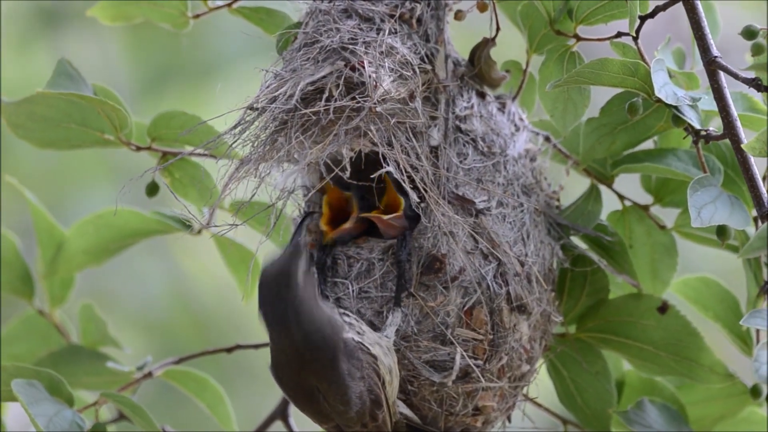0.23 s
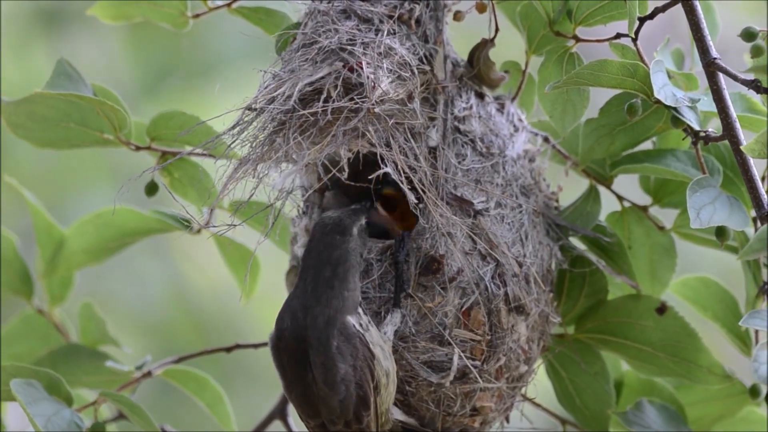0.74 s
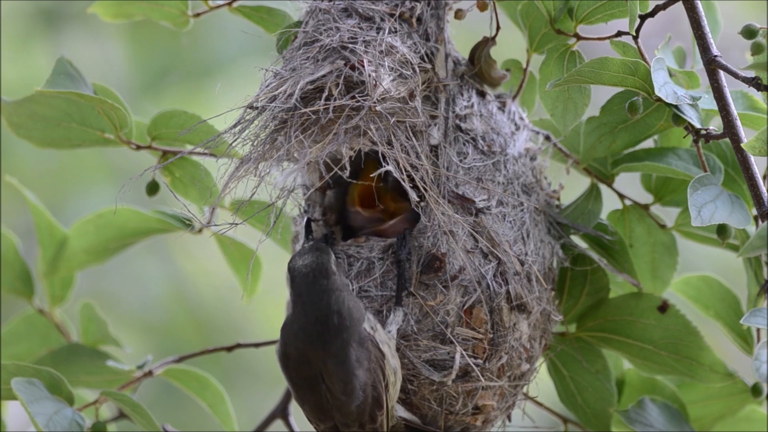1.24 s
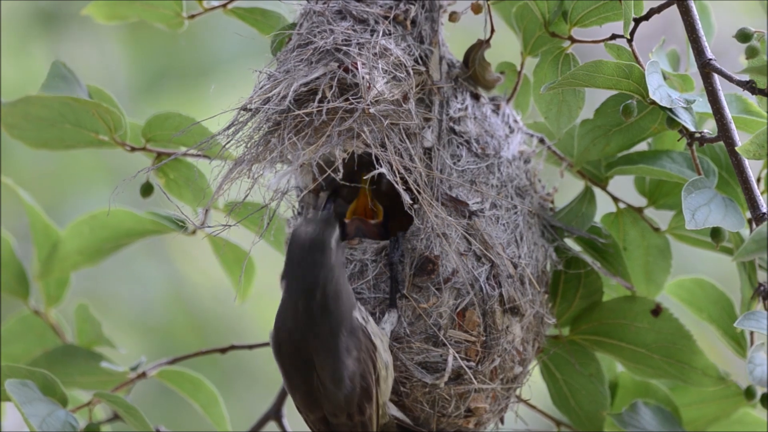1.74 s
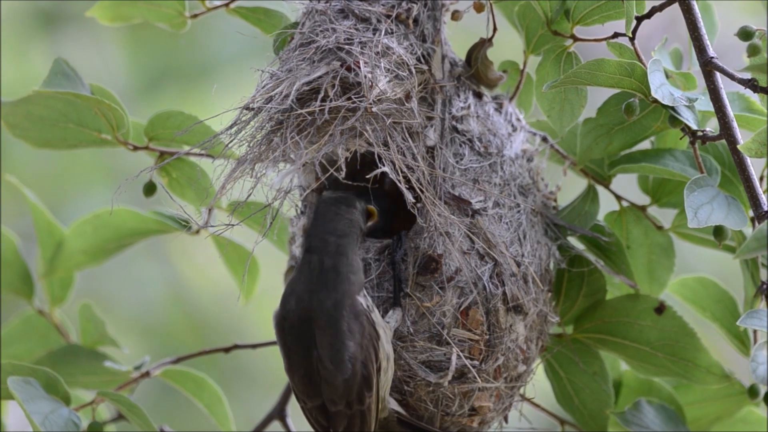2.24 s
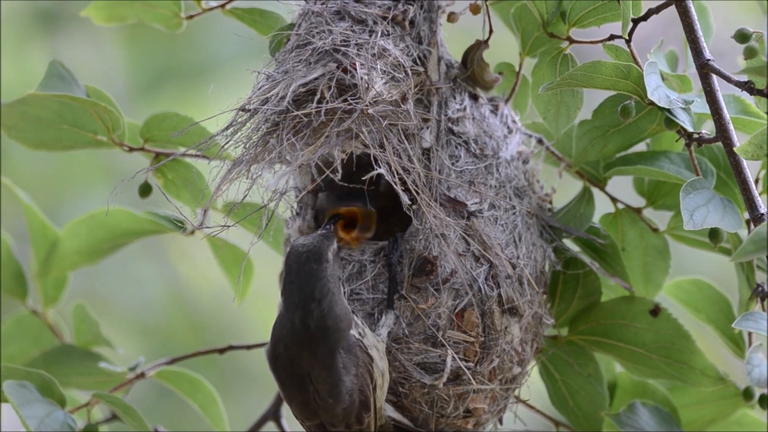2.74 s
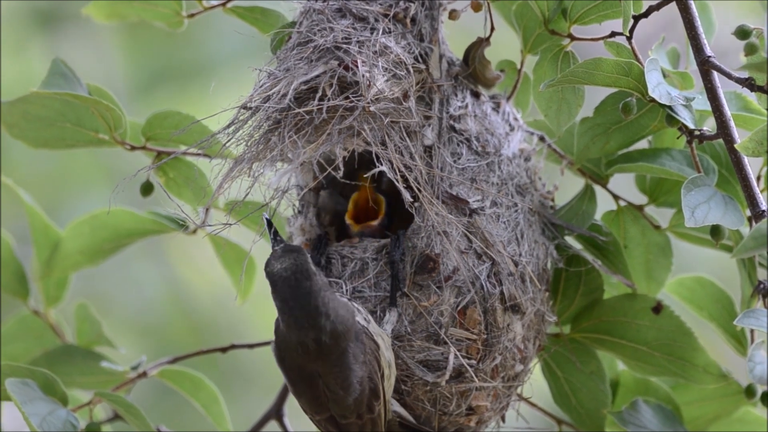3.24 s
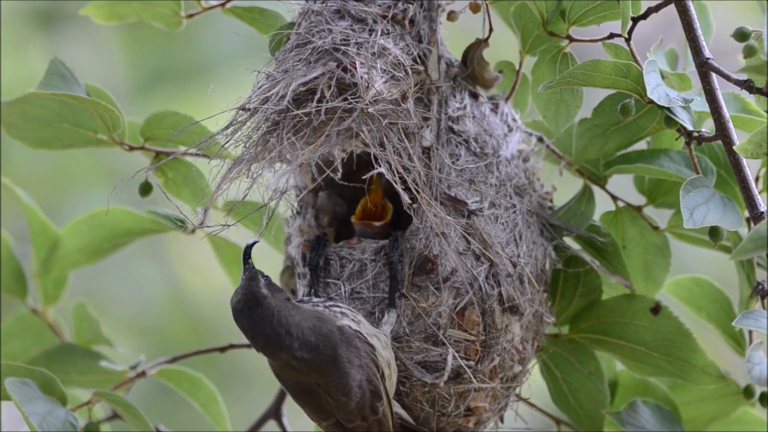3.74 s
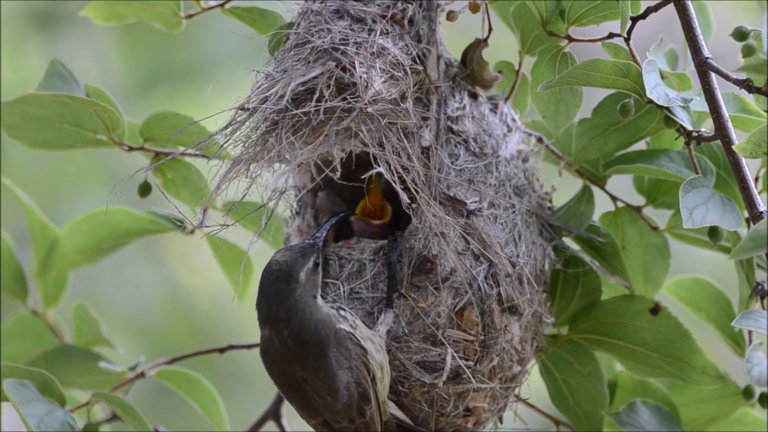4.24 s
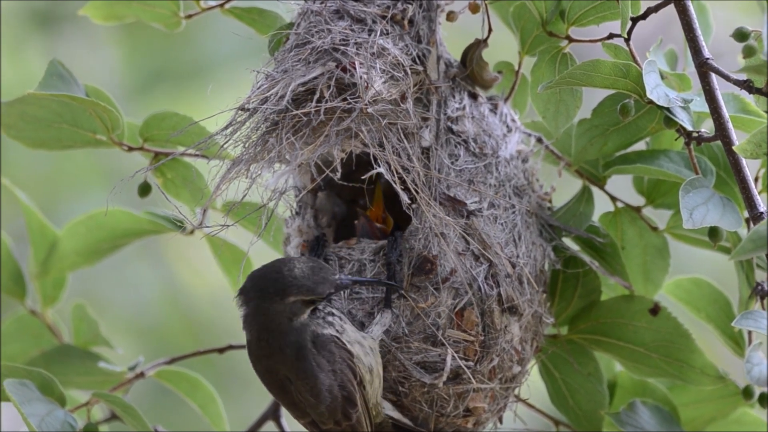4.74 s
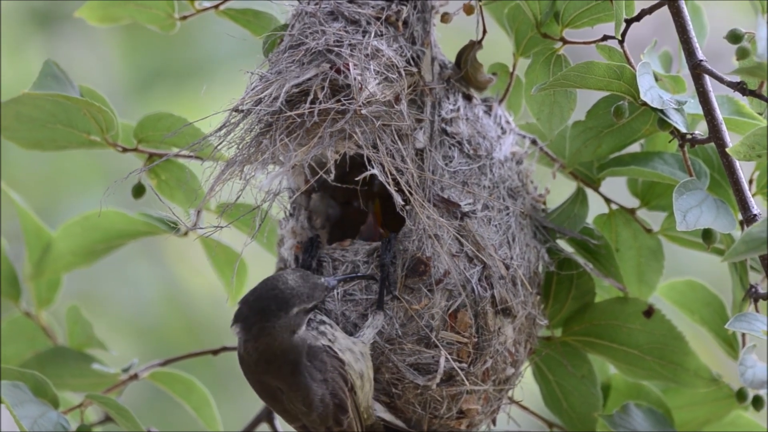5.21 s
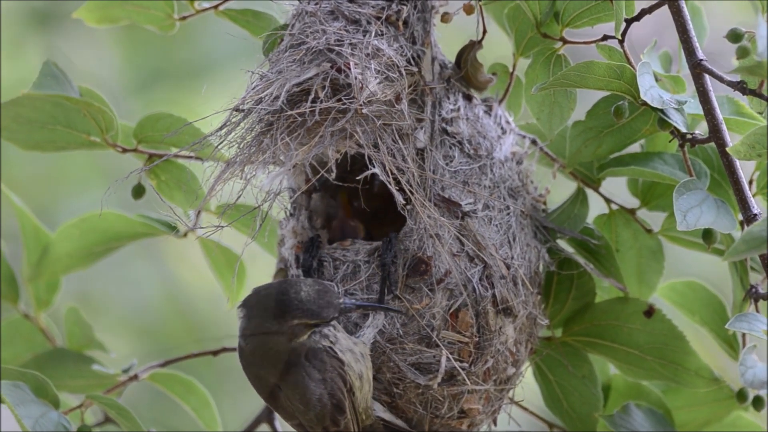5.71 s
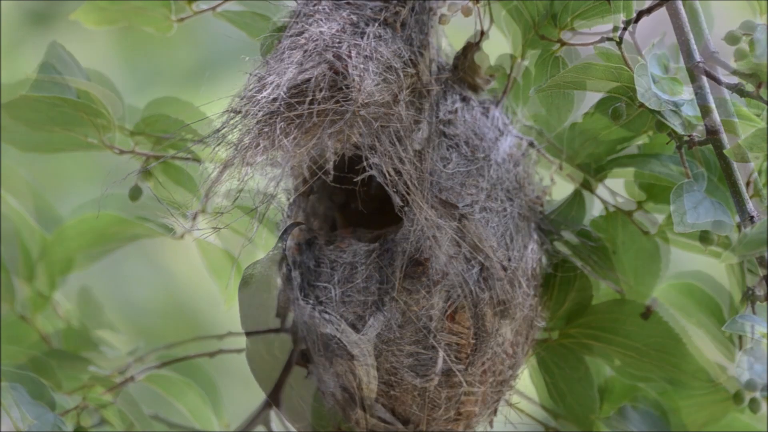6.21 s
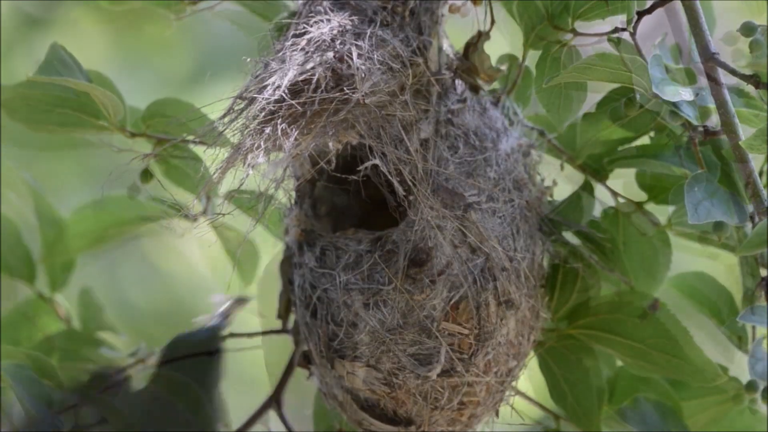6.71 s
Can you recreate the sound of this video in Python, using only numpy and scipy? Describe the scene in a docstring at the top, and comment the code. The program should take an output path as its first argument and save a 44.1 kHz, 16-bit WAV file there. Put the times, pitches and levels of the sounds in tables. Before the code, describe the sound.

Outdoors among leaves, close to a nest, over a faint town murmur, slight hum and soft low rumble. From 0 to 0.3 s a near small bird gives rapid high notes that drop and rebound, and a nestling buzz begins; another two-voiced flourish comes around 0.75 s. Grass scratches and twigs tick near 1 s. A falling chirp at 1.4 s is followed by thin begging, ticks and rustles to 1.9 s. Begging returns at 2.3 s, with faint distant caws from 2.5 to 3.4 s. A chirp falls at 3.1 s amid swelling twitter; varied jumping whistles run from 3.55 to 4.3 s, with rustles and clicks. A faint short trill at 4.7 s leads to a stronger chirp at 4.9 s. The loudest, densest whistles burst from 5.2 to 5.65 s with a sharp tick and soft bump. Begging buzzes at 6.1 s, one chirp falls at 6.5 s, and quick rising notes close at 6.9 s.

```python
"""A small songbird calls near the microphone in a garden: two-voiced whistles glide and jump, with leafy echoes.
Fainter whistles answer softly, nestlings beg in a high buzz and a flickering twitter swells; twigs tick,
dry grass rustles and a town murmurs with a faint hum and a low rumble. The whistles are gliding sines,
the near ones with overtones and breath; twitter, buzz and town are coloured noise; ticks, crackles and
grass are short bursts and clicks."""
import sys
import numpy as np
from scipy import signal
from scipy.fft import rfft, irfft, next_fast_len
from scipy.io import wavfile
from scipy.ndimage import uniform_filter1d, map_coordinates

SR = 44100
rng = np.random.default_rng(int(sys.argv[2]) if len(sys.argv) > 2 else 0)


def to_wav(s):
    """Save 16-bit WAV."""
    ch = np.atleast_2d(s).T  # columns
    pcm = np.round(np.clip(ch, -1, 1) * 32767)  # PCM
    wavfile.write(sys.argv[1], SR, pcm.astype(np.int16))


N = 306936  # length in samples

# How the echo of the foliage dies away. Each row: frequency in Hz, time to fall by 60 dB in seconds.
LEAVES = [(1200, 0.18), (3000, 0.18), (6000, 0.23), (12000, 0.15)]


def amp(db):
    """Turns decibels into a linear gain."""
    return 10 ** (np.asarray(db) / 20)


def unit(x):
    """Scales a signal to an rms of 1."""
    return x / np.sqrt(np.mean(x ** 2) + 1e-20)


def along(points, hz):
    """Reads a curve of (Hz, value) points on a logarithmic frequency axis."""
    f, v = np.transpose(points)
    return np.interp(np.log(hz + 1), np.log(f + 1), v)


def wobble(rate):
    """A smooth random curve through `rate` random knots a second."""
    knots = rng.standard_normal(int(N * rate / SR) + 4)
    return map_coordinates(knots, [np.arange(N) * rate / SR])


def filtered(x, response):
    """Shapes the spectrum of x with a gain that depends on frequency."""
    m = next_fast_len(N + SR // 2)
    return irfft(rfft(x, m) * response(np.fft.rfftfreq(m, 1 / SR)), m)[:N]


def rush(spectrum, patchy_db):
    """Coloured noise of rms 1, uneven in time and frequency through patches of random gain."""
    z = signal.stft(rng.standard_normal(N), nperseg=256)[2]
    patches = uniform_filter1d(rng.standard_normal(z.shape), size=3, axis=0)
    patches = uniform_filter1d(patches, size=6, axis=1)
    x = signal.istft(z * amp(patchy_db * unit(patches)), nperseg=256)[1][:N]
    return unit(filtered(x, lambda hz: amp(along(spectrum, hz))))


def swells(rows, early):
    """Gain that rises and falls once per (start, length, dB); early under 1 brings the top forward."""
    t = np.arange(N) / SR
    gain = np.zeros(N)
    for s, length, db in rows:
        progress = np.clip((t - s) / length, 0, 1) ** early
        gain += amp(db) * np.sqrt(np.abs(np.sin(np.pi * progress)))
    return gain


def echo(x, delay, decay):
    """Scattered answer of the foliage: noise tails, a new one every 0.12 s as leaves and bird move."""
    step, lag = round(.12 * SR), round(delay * SR)
    out = np.zeros(N + SR)
    starts = np.arange(0, N + step, step)
    # overlapping windowed pieces crossfade from one tail to the next
    pieces = np.pad(x, (step, 2 * step))[starts[:, None] + np.arange(2 * step)]
    pieces = pieces * signal.windows.hann(2 * step, sym=False)
    hz, t, z = signal.stft(rng.standard_normal((len(starts), SR // 5)), SR, nperseg=128)
    fading = z * amp(-60 * t / along(decay, hz)[:, None])
    tails = signal.istft(fading, SR, nperseg=128)[1]
    tails = tails / np.linalg.norm(tails, axis=1, keepdims=True)
    parts = signal.fftconvolve(pieces, tails, axes=1)
    for i, part in zip(starts, parts):
        out[i + lag:][:len(part)] += part[:len(out) - i - lag]
    return out[step:][:N]


def glide(start, length, first_hz, middle_hz, last_hz, top_db, top, in_db, out_db):
    """A note that bends through three pitches and swells once; in_db and out_db are relative to the top."""
    u = np.linspace(0, 1, 9)
    bend = np.polyfit([0, .5, 1], [first_hz, middle_hz, last_hz], 2)
    db = top_db + np.interp(u, [0, np.clip(top, .05, .95), 1], [in_db, 0, out_db])
    return np.transpose([start + length * u, np.polyval(bend, u), db])


def whistles(notes, partials, jitter, flutter_db, edge):
    """Sine notes, unsteady in pitch and size: returns fundamentals, overtones and a gain for noise."""
    beak_hz = 11600  # the open beak rings here
    fundamental, overtones, noise_gain = np.zeros((3, N))
    shake, flutter = wobble(400), wobble(250)
    for note, (second_db, third_db, noise_db) in zip(notes, partials):
        s, hz, db = np.transpose(note)
        i = np.arange(max(round((s[0] - edge) * SR), 0), min(round((s[-1] + edge) * SR), N))
        t = i / SR
        pitch = uniform_filter1d(np.interp(t, s, hz), size=100, mode="nearest")
        pitch = pitch * (1 + jitter * shake[i])
        phase = 2 * np.pi * (np.cumsum(pitch) / SR + rng.random())
        gate = np.clip(np.minimum(t - s[0], s[-1] - t) / edge + 1, 0, 1) ** 2
        size = np.sqrt(2) * gate * amp(np.interp(t, s, db) + flutter_db * flutter[i])
        effort = size / size.max()  # the third partial grows faster than the note
        effort /= 1 + ((beak_hz - 3 * pitch) / 1500) ** 4  # and sounds only near the beak's resonance
        dull = 1 / (1 + (pitch / 4500) ** 12)  # the second partial vanishes from the highest notes
        second = dull * amp(second_db) * np.sin(2 * phase)
        fourth = amp(-21) * (pitch < SR / 11) * np.sin(4 * phase)  # left out where it would rise above about 16 kHz
        upper = effort * amp(third_db) * (np.sin(3 * phase) + fourth)
        fundamental[i] += size * np.sin(phase)
        overtones[i] += size * (second + upper)
        noise_gain[i] += size * amp(noise_db)
    return fundamental, overtones, noise_gain


def town():
    """Murmur of the town as slowly wavering broadband noise, over the bass rumble of traffic and wind."""
    # Murmur colour. Each row: frequency in Hz, relative level in dB.
    murmur_colour = [(15, -22), (30, -9.5), (50, -10.5), (120, -11.5), (250, -13.5), (500, -15.5),
                     (1000, -12), (2000, -18.5), (4000, -21.5), (6300, -28), (8000, -27), (10000, -36.5),
                     (13000, -39), (16000, -47.5)]
    # Traffic and wind. Each row: time in seconds, level in dB around which the rumble wavers.
    rumble_levels = [(0, -80), (1.2, -76), (1.9, -72), (2.8, -72), (3.3, -74), (3.75, -66), (4.3, -76),
                     (5.0, -73), (5.5, -73), (6.0, -77), (6.6, -73), (6.96, -78)]
    deep = [(15, -24), (30, -6), (50, 2), (90, -10.5), (200, -43)]  # Hz, relative dB
    murmur = amp(-68 + 1.3 * wobble(4.5)) * rush(murmur_colour, patchy_db=1.9)
    rumble_db = np.interp(np.arange(N) / SR, *np.transpose(rumble_levels)) + 3 * wobble(5)
    return murmur + amp(rumble_db) * rush(deep, patchy_db=3.0)


def hum():
    """Wavering hum: each tone is noise squeezed into a narrow band."""
    # Hum tones. Each row: centre in Hz, half width in Hz, level in dB before the make-up gain.
    hum_tones = [(48.4, 6, -77), (96.6, 6, -87), (189.3, 4.5, -82), (470, 11, -81.5)]

    def bands(f):
        return sum(amp(db) / np.sqrt(w) / (1 + ((f - hz) / w) ** 4) for hz, w, db in hum_tones)

    return amp(39.5) * filtered(rng.standard_normal(N), bands)  # make-up gain for the narrow bands


def flickering_twitter():
    """Flickering noise in the whistle range: distant twitter, and reverberation of the near bird around 5.5 s."""
    # Loudness of the flickering noise. Each row: time in seconds, level in dB.
    flicker_levels = [(0.0, -72), (.2, -66), (.4, -73), (.83, -65), (1.05, -68), (1.7, -59), (1.94, -67),
                      (2.29, -65.5), (3.27, -52), (4.05, -58), (4.32, -53), (4.71, -66), (5.0, -54),
                      (5.3, -60), (5.42, -45), (5.53, -43), (5.7, -47), (5.8, -58), (5.9, -66), (6.47, -69),
                      (6.61, -56), (6.96, -58)]
    # Colour of the flickering noise. Each row: frequency in Hz, relative level in dB.
    flicker_colour = [(900, -52), (1200, -24.5), (1600, -8.5), (1950, -7.5), (2500, 1), (3000, -4.5),
                      (3800, -21), (5000, -25), (6000, -49), (9000, -86.5)]
    flicker = unit(amp(1.23 * wobble(60)) * rush(flicker_colour, patchy_db=3.0))
    return amp(np.interp(np.arange(N) / SR, *np.transpose(flicker_levels))) * flicker


def begging():
    """Nestlings beg in a high buzz: throbbing treble noise that swells with each bout."""
    # Begging bouts. Each row: start in seconds, length in seconds, top level in dB.
    bouts = [(.04, .3, -68), (.95, 0.13, -78), (1.44, 0.29, -68), (2.26, .3, -68), (3.24, 0.22, -65.5),
             (4.88, 0.26, -65.5), (5.43, 0.19, -70.5), (6.11, 0.22, -65)]
    # Buzz colour. Each row: frequency in Hz, relative level in dB.
    buzz_colour = [(4000, -48.5), (5800, -18.5), (6300, -1), (6700, -9), (7200, -9.5), (7900, -4),
                   (8700, -5.5), (9400, -12.5), (10200, -21), (13000, -25.5), (16000, -38)]
    buzz = unit(amp(1.5 * wobble(200)) * rush(buzz_colour, patchy_db=2.5))
    return swells(bouts, early=1.5) * buzz


def faint_glides():
    """Faint single glides of farther birds, with some faint overtones, combination tones and echoes
    of the near bird, and a far trill of five short rising notes, each softer."""
    # Faint glides. Each row: start in seconds, length in seconds, first, middle and last pitch in Hz,
    # top level in dB before the faint mix, place of the top from 0 to 1.
    faint_rows = [(.02, .023, 4970, 4950, 4900, -54, .2), (.05, .16, 6300, 6700, 7750, -71, .9),
                  (.211, .058, 7800, 8300, 9210, -62, .7), (.28, .025, 5100, 6200, 7350, -52, .3),
                  (.305, .03, 7350, 7380, 7380, -56, .1), (.526, .024, 2740, 2820, 2580, -61, .3),
                  (1.105, .1, 6050, 6150, 6300, -75, .6), (1.22, .03, 1690, 1690, 1690, -59.5, .3),
                  (1.385, .035, 5120, 5270, 5200, -58, .5), (1.392, .02, 1230, 1300, 1270, -50, .5),
                  (1.435, .025, 5080, 5060, 4960, -53.5, .5), (1.478, .027, 3600, 3200, 2850, -46, .4),
                  (1.565, .054, 8100, 8250, 8400, -74, .9), (1.79, .018, 5660, 4700, 3900, -66, .9),
                  (1.809, .013, 3650, 3260, 2780, -46, .5), (1.82, .04, 4970, 4950, 4920, -70, .5),
                  (2.406, .033, 1520, 1690, 1520, -61, .45), (2.52, .025, 2260, 2330, 2420, -51, .4),
                  (2.605, .085, 6120, 6330, 6250, -64, .7), (2.8, .055, 2330, 2520, 2700, -60, .5),
                  (2.75, .05, 2290, 2295, 2310, -56, .6), (2.9, .07, 2380, 2380, 2370, -55, .5),
                  (3.21, .03, 5090, 5050, 5000, -64, .6), (3.43, .1, 4980, 4870, 4920, -61, .6),
                  (4.431, .03, 3220, 3300, 3450, -58, .6), (4.461, .065, 3500, 4100, 4750, -62, .4),
                  (5.6, .035, 5900, 6250, 5800, -55, .4), (4.62, .035, 2830, 2930, 3150, -61, .7),
                  (4.882, .038, 4940, 4940, 4670, -40, .1), (5.021, .046, 7400, 8400, 9930, -66, .6),
                  (5.041, .026, 4120, 4550, 5170, -64, .8), (5.068, .035, 6600, 7100, 7400, -57, .6),
                  (5.103, .036, 7400, 7410, 7420, -55, .1), (5.075, .044, 8480, 8510, 8540, -66, .3),
                  (5.401, .044, 6100, 6400, 6550, -69, .9), (6.256, .04, 8420, 8900, 9670, -64, .2),
                  (6.276, .024, 4400, 4900, 5500, -65, .8), (6.303, .047, 7430, 7940, 7930, -55, .4),
                  (6.306, .044, 8350, 8930, 8790, -64, .2), (6.51, .03, 3920, 3500, 3090, -33.5, .2)]
    notes = [glide(*row, in_db=-9, out_db=-10) for row in faint_rows]
    start, every, hz, swing = 4.655, .031, 3330, .04  # seconds, seconds, Hz, share of the pitch
    for k in range(5):
        low, high = hz * (1 - swing), hz * (1 + swing)
        notes.append(glide(start + k * every, .6 * every, low, hz, high, -57 - 1.2 * k,
                           top=.5, in_db=-4, out_db=-5))
    return notes


def nestling_whines():
    """A nestling's thin whine sags slightly, swells and ends in an upward flick."""
    # Whines. Each row: start in seconds, length in seconds, pitch in Hz, top level in dB,
    # flick pitch in Hz, flick level in dB, both levels before the faint mix.
    whines = [(1.53, .165, 6680, -67, 7140, -70), (2.33, .19, 6650, -68, 7360, -66),
              (3.26, .15, 6550, -68, 7600, -62), (4.95, .08, 6700, -67, 7300, -80),
              (6.125, .08, 6730, -72, 7300, -85)]
    notes = []
    for s, length, hz, db, flick_hz, flick_db in whines:
        notes.append(glide(s, length, hz, .98 * hz, hz, db, top=.9, in_db=-10, out_db=-3))
        notes.append(glide(s + length, .03, .97 * flick_hz, flick_hz, flick_hz, flick_db,
                           top=.4, in_db=-6, out_db=-12))
    return notes


def far_caws():
    """A far caller of which only overtones 5 to 7 are heard, each arching and then falling."""
    # Caws. Each row: start in seconds, voice pitch in Hz, level of overtone 6 in dB before the faint mix.
    caws = [(2.48, 384, -62), (2.66, 385, -55), (2.825, 397, -53), (3.0, 402, -55), (3.185, 388, -48),
            (3.35, 385, -51)]
    notes = []
    for s, voice_hz, db in caws:
        for k, relative_db in [(5, -6), (6, 0), (7, -8)]:
            hz = k * voice_hz
            notes.append(glide(s, .11, hz, 1.004 * hz, .94 * hz, db + relative_db,
                               top=.3, in_db=-6, out_db=-8))
    return notes


def faint_whistles():
    """The faint tones are plain sines with a strong share of leafy echo."""
    notes = faint_glides() + nestling_whines() + far_caws()
    partials = [(-45, -60, -54)] * len(notes)  # unheard: only the fundamentals are kept
    voice = whistles(notes, partials, jitter=.004, flutter_db=3.0, edge=0.0054)[0]
    return amp(0.5) * voice + amp(-4.5) * echo(voice, 0.003, LEAVES)


def snaps():
    """A tick is a short double knock of a few cycles; a crackle is a short puff of treble noise."""
    # Twig and beak ticks. Each row: start in seconds, level in dB before the trim, pitch in Hz.
    ticks = [(0.4732, -54, 2580), (0.924, -54, 2700), (0.955, -46, 2610), (0.9678, -56, 2730),
             (0.9956, -59, 2480), (1.0467, -42, 2500), (1.061, -42.5, 3120), (1.6155, -37.5, 3000),
             (1.65, -35, 2830), (1.7583, -23, 2710), (1.909, -39, 1880), (2.7973, -38, 1940),
             (3.8574, -52, 3230), (3.9055, -30, 2700), (4.2854, -36, 2980), (4.3975, -29.5, 2670),
             (4.4215, -20, 2630), (4.466, -37.5, 2640), (4.8137, -42, 3070), (5.5954, -15, 2900),
             (5.666, -27.5, 2660), (6.179, -47.5, 4450)]
    # Dry leaf crackles. Each row: start in seconds, level in dB before trim and treble colour.
    crackles = [(0.4728, -69), (0.598, -74), (1.061, -68.5), (1.273, -70.5), (1.296, -68), (1.5883, -62),
                (2.085, -60.5), (2.6378, -66), (2.8005, -67.5), (3.2439, -65), (4.249, -71.5),
                (6.6593, -74), (6.8048, -61)]
    treble = [(4000, -56), (6500, 12.5), (9000, 20), (13000, -2.5), (16000, -32)]  # Hz, gain in dB
    knocks, puffs = np.zeros((2, N + SR))
    t = np.arange(SR // 20) / SR
    double_knock = np.exp(-((t - .0015) / .0008) ** 2) + .4 * np.exp(-((t - .003) / .0008) ** 2)
    for s, db, hz in ticks:
        ring = np.sin(2 * np.pi * hz * t) + 0.49 * np.sin(2 * np.pi * 0.709 * hz * t)
        knocks[round(s * SR):][:len(t)] += amp(db - 3) * double_knock * ring
    for s, db in crackles:
        fade_db = -60 * t / 0.1
        puffs[round(s * SR):][:len(t)] += amp(db - 12 + fade_db) * rng.standard_normal(len(t))
    out = knocks[:N] + filtered(puffs[:N], lambda hz: amp(along(treble, hz)))
    return out + amp(-15) * echo(out, 0.0078, LEAVES)


def rustles(count=20000):
    """Scrabbled dry grass breaks in tiny clicks of unequal size."""
    # Scrabbling. Each row: start in seconds, length in seconds, top level in dB.
    scrabbles = [(0.903, 0.22, -59), (1.2, 0.061, -62), (1.599, .1, -53.5), (1.824, 0.1, -55.5),
                 (2.24, 0.096, -70), (4.09, 0.04, -52), (4.267, 0.085, -45), (4.405, 0.093, -57.5),
                 (4.8, 0.077, -53), (5.652, 0.12, -61), (5.803, 0.041, -53), (6.0, 0.07, -64.5)]
    # Grass colour. Each row: frequency in Hz, relative level in dB.
    grass_colour = [(900, -48), (1500, -8), (2700, 5.5), (4000, -5.5), (5200, -11.5), (6000, -29.5),
                    (9000, -26.5), (14000, -50.5)]
    clicks = np.zeros(N)
    sizes = amp(3 * rng.exponential(size=count))
    clicks[rng.integers(0, N, count)] = sizes * rng.choice([-1, 1], count)
    grass = filtered(clicks * amp(3 * wobble(120)), lambda hz: amp(along(grass_colour, hz)))
    return swells(scrabbles, early=0.72) * unit(grass)


def branch_bump():
    """A soft bump of the branch: a brief swell of low random movement."""
    # The bump: time of its top in seconds, level in dB.
    bump = (5.72, -64)
    s, db = bump
    return amp(db) * wobble(390) * np.exp(-((np.arange(N) / SR - s) / 0.027) ** 2)


def chirps(second_db, plain_third_db):
    """Falling chirps sung by both sides of the syrinx at once, the high voice with its own entry."""
    # Fall of the low and of the high voice. Each row: time from the chirp's middle in seconds before
    # any stretch, pitch over the middle pitch, level relative to the voice in dB.
    low_fall = [(-.034, 1.32, -14), (-.016, 1.1, 0), (.008, .94, -8), (.025, .81, -7), (.045, .73, -20)]
    high_fall = [(-.01, 1.09, -.7), (.001, .995, -.7), (.02, .88, -5), (.035, .81, -4.5), (.044, .75, -13)]
    # Chirps. Each row: middle in seconds, entry and bend of the high voice in seconds before it,
    # stretch of the low and high tail, low, entry, bend and high pitch in Hz,
    # low, high, entry and bend level in dB, third partial and hoarse noise in dB.
    chirp_rows = [(1.438, .047, .018, 1.12, 1.02, 2270, 4200, 3760, 3230, -25.5, -20.5, -41, -29, -30, -17),
                  (3.126, .051, .022, .88, .9, 2300, 4260, 4090, 3200, -29, -19.5, -43, -20.5, -23.5, -17),
                  (4.915, .048, .031, 1.1, .8, 2300, 3450, 3930, 3230, -23, -19, -32, -20, -19, -15),
                  (6.494, .038, .024, 1.12, 1.1, 2200, 3850, 3830, 3150, -30, -18.5, -46, -29, -53, -21)]

    def fall(shape, s, tail, hz, db):
        return [(s + t * (tail if t > 0 else 1), hz * ratio, db + under) for t, ratio, under in shape]

    notes = []
    for (s, entry, bend, low_tail, high_tail, low_hz, entry_hz, bend_hz, high_hz,
         low_db, high_db, entry_db, bend_db, third_db, hoarse_db) in chirp_rows:
        low = fall(low_fall, s, low_tail, low_hz, low_db)
        high = [(s - entry, entry_hz, entry_db), (s - bend, bend_hz, bend_db)]
        high += fall(high_fall, s, high_tail, high_hz, high_db)
        notes.append((low, (second_db, plain_third_db, hoarse_db)))
        notes.append((high, (second_db, third_db, hoarse_db)))
    return notes


def drops():
    """Notes held high that drop, softer on the way down, linger in a trough and rebound."""
    # Drops. Each row: start, drop, trough and end in seconds, first, held, trough and end pitch in Hz,
    # held, trough and end level in dB, third partial and hoarse noise in dB.
    drop_rows = [(0.0, .022, .032, .045, 4150, 4100, 2450, 2550, -30, -28, -35, -60, -30),
                 (.12, .134, .146, .165, 4100, 4180, 2450, 3350, -30, -25, -30, -60, -14),
                 (.251, .266, .282, .294, 4400, 4200, 2560, 3220, -27, -26.5, -29, -60, -17),
                 (.294, .297, .307, .32, 3220, 3200, 2600, 3000, -29, -27.5, -37, -60, -17),
                 (5.438, 5.452, 5.465, 5.482, 4050, 4250, 2470, 3400, -22, -16, -21, -44, -22),
                 (5.483, 5.496, 5.505, 5.514, 3980, 3780, 2200, 2450, -18.5, -24, -35, -22, -11),
                 (5.569, 5.588, 5.597, 5.614, 4200, 4330, 2740, 3150, -26, -18, -21, -46, -18)]
    linger = .003  # seconds to either side of the trough
    notes = []
    for (s, drop, trough, end, first_hz, held_hz, low_hz, end_hz,
         held_db, low_db, end_db, third_db, hoarse_db) in drop_rows:
        # the softest point lies 0.4 into the drop's time and 0.6 down its fall
        softest = (drop + .4 * (trough - linger - drop), held_hz - .6 * (held_hz - low_hz),
                   (held_db + low_db) / 2 - 9)
        note = [(s, first_hz, held_db - 3), ((s + drop) / 2, held_hz, held_db),
                (drop, .97 * held_hz, held_db), softest,
                (trough - linger, low_hz, low_db), (trough + linger, low_hz, low_db),
                (end, end_hz, end_db)]
        notes.append((note, (-41, third_db, hoarse_db)))
    return notes


def song():
    """All near notes with their partials; overlapping notes are two voices, or one voice and its strong octave."""
    # Longer flourishes. In each, the first row: second partial, third partial, hoarse noise in dB.
    # Each further row: time in seconds, pitch in Hz, level in dB.
    flourishes = [
        [(-47, -56, -20.5), (.61, 3145, -58), (.64, 3270, -44), (.665, 3450, -52), (.724, 2785, -38.5),
         (.751, 2544, -30), (.774, 2475, -33), (.789, 3274, -30), (.804, 3290, -25), (.812, 3400, -39)],
        [(-53, -30, -28.5), (.621, 4100, -49), (.637, 5050, -46.5), (.65, 5700, -62), (.668, 6050, -78),
         (.688, 5530, -53), (.721, 4450, -39), (.737, 4120, -23.5), (.748, 4100, -27), (.755, 3900, -40),
         (.768, 3780, -37.5), (.787, 4130, -36.5), (.81, 4050, -41)],
        [(-19, -23, -28), (3.536, 5450, -45), (3.562, 4990, -28), (3.568, 4450, -45), (3.58, 3500, -56),
         (3.6, 2550, -47), (3.64, 2210, -41), (3.655, 2300, -39), (3.667, 2540, -29), (3.688, 3830, -36),
         (3.698, 2330, -42)],
        [(-14, -26, -7), (3.572, 4250, -46), (3.588, 3850, -55), (3.601, 3350, -46), (3.618, 3260, -41),
         (3.64, 3260, -41), (3.659, 3650, -42), (3.675, 4200, -48)],
        [(-24, -50, -9), (3.857, 3540, -44), (3.879, 2970, -37.5), (3.893, 2050, -40), (3.903, 1980, -35),
         (3.912, 4580, -40), (3.919, 5600, -38.5)],
        [(-23.5, -59, -18.5), (4.066, 3920, -52), (4.083, 3220, -43), (4.1, 4030, -44), (4.112, 4254, -26),
         (4.13, 4530, -46)],
        [(-45, -60, -12), (4.252, 5040, -46), (4.262, 5100, -41), (4.281, 3570, -47), (4.289, 2860, -38),
         (4.297, 1900, -48)],
        [(-42, -23, -23), (5.311, 3950, -21), (5.327, 4200, -20), (5.336, 4000, -17), (5.343, 3850, -19),
         (5.348, 3250, -14), (5.362, 3200, -26), (5.372, 3250, -37), (5.378, 3400, -30), (5.386, 3330, -44)],
        [(-42, -40, -23), (5.238, 4630, -50), (5.245, 4830, -41.5), (5.265, 4650, -48), (5.285, 4520, -36),
         (5.301, 4600, -39), (5.308, 4250, -24)],
    ]
    # Single glides. Each row: start in seconds, length in seconds, first, middle and last pitch in Hz,
    # top level in dB, place of the top from 0 to 1, hoarse noise in dB.
    near_glides = [(.108, .011, 2360, 2750, 3080, -40, .4, -3), (.173, .019, 3650, 2950, 1950, -25, .3, -9),
                   (.204, .005, 2710, 2300, 1810, -37, .1, -2), (.238, .008, 2320, 2750, 3190, -41, .9, -3),
                   (1.373, .036, 2890, 3480, 3150, -35, .8, -14),
                   (3.057, .032, 2850, 3390, 2900, -41, .6, -16),
                   (4.846, .032, 3050, 3230, 3150, -29, .6, -14),
                   (5.562, .008, 3350, 3700, 4150, -29, .5, -18),
                   (6.425, .042, 2800, 3000, 2900, -36, .65, -25),
                   (3.745, .011, 7300, 7400, 7200, -41, .5, -20),
                   (3.756, .012, 6700, 5000, 3200, -39, .6, -9),
                   (3.77, .012, 3050, 3050, 3400, -33, .4, -19),
                   (3.783, .031, 3490, 4170, 3030, -36, .45, -19),
                   (3.78, .032, 1760, 2040, 1780, -38, .7, -3), (3.77, .014, 4440, 4600, 4970, -40, .2, -2),
                   (3.88, .014, 5100, 4500, 3880, -46, .6, -9.5),
                   (3.93, .062, 5900, 6250, 6290, -62, .8, -18),
                   (3.993, .014, 6000, 5850, 5550, -50, .7, -18),
                   (3.96, .025, 4220, 4060, 4450, -41, .5, -27),
                   (3.985, .018, 4500, 4800, 4600, -37, .6, -27),
                   (4.111, .017, 5350, 5280, 4850, -35, .9, -12),
                   (4.298, .021, 3000, 2900, 2920, -41, .5, -1),
                   (5.208, .016, 2440, 2850, 3050, -37, .7, -21),
                   (5.222, .024, 3490, 3770, 3785, -32, .45, -19),
                   (5.368, .042, 5550, 4000, 2180, -38, .6, -7),
                   (5.426, .014, 2156, 2750, 3370, -21, .5, -16),
                   (5.618, .021, 2900, 3020, 2950, -19, .2, -18),
                   (6.9, .016, 2830, 3150, 3690, -34, .5, -27),
                   (6.915, .035, 3650, 3850, 3700, -35, .2, -27),
                   (6.93, .03, 4440, 4760, 4810, -37, .9, -27)]
    second_db, third_db = -45, -58  # partials of the plainer notes
    notes = [(f[1:], f[0]) for f in flourishes]
    notes += chirps(second_db, third_db) + drops()
    for *g, hoarse_db in near_glides:
        notes.append((glide(*g, in_db=-12, out_db=-11), (second_db, third_db, hoarse_db)))
    return zip(*notes)


def near_bird():
    """At full effort the two voices strain against each other: sum and difference tones, rasp and breath."""
    # Throat colour of the overtones. Each row: frequency in Hz, gain in dB.
    throat = [(600, -41), (1200, -3), (5200, 9.5), (6000, -4), (8500, -6.5), (9600, -16.5), (10800, -4.5),
              (11700, -0.5), (12900, -13.5), (15000, -6.5)]
    # Hoarse noise colour. Each row: frequency in Hz, relative level in dB.
    hoarse_colour = [(800, -50), (1250, -17.5), (1800, -8), (2700, 9), (4000, 2), (5100, -15.5),
                     (5700, -36), (8500, -31), (9500, -47.5), (11500, -35.5), (13000, -54.5),
                     (15000, -50.5)]
    voice, overtones, hoarse_gain = whistles(*song(), jitter=0.0027, flutter_db=0.77, edge=.004)
    strain = amp(-22) * voice ** 2 + amp(-3.5) * voice ** 3
    rasp = overtones * (1 + 0.91 * wobble(1100))
    breath = amp(-21) * voice * wobble(900)
    hoarse = hoarse_gain * amp(0.83 * wobble(300)) * rush(hoarse_colour, patchy_db=7.5)
    coloured = filtered(strain + rasp, lambda hz: amp(along(throat, hz)))
    call = voice + breath + hoarse + coloured
    near = [(hz, 0.65 * t60) for hz, t60 in LEAVES]  # the closest leaves answer first and die fast
    return amp(-0.39) * call + amp(-9) * echo(call, .003, near) + amp(-25.5) * echo(call, 0.018, LEAVES)


def scene():
    """Lays the garden, the faint whistles and the small noises under the near bird."""
    background = town() + hum() + flickering_twitter() + begging()
    small_noises = snaps() + rustles() + branch_bump()
    return (background + faint_whistles() + small_noises + near_bird())[None]


def record(dry):
    """The recorder keeps nothing above its band limit of 15760 Hz."""
    return filtered(dry[0], lambda hz: hz < 15760)[None]


dry = scene()
out = record(dry)
to_wav(out)
```